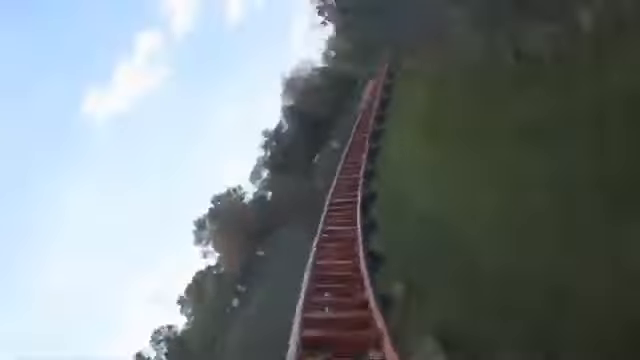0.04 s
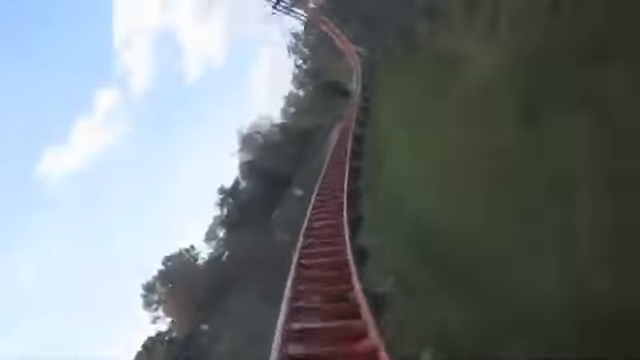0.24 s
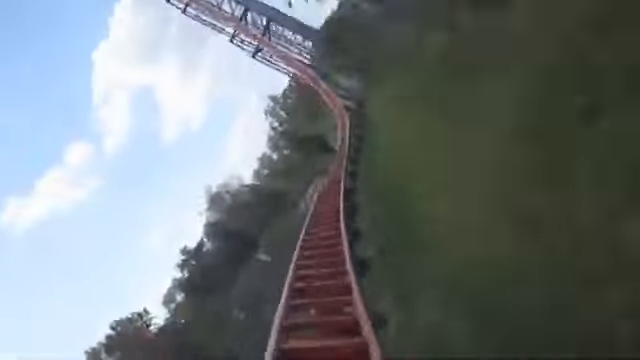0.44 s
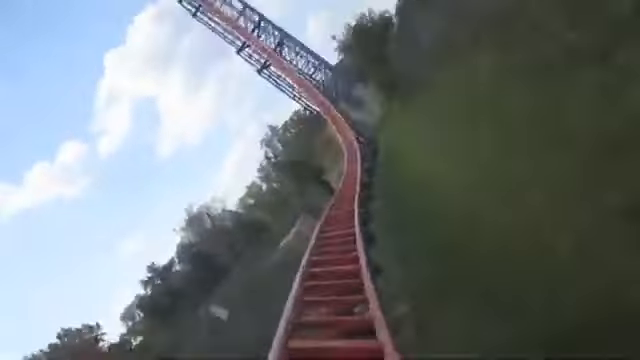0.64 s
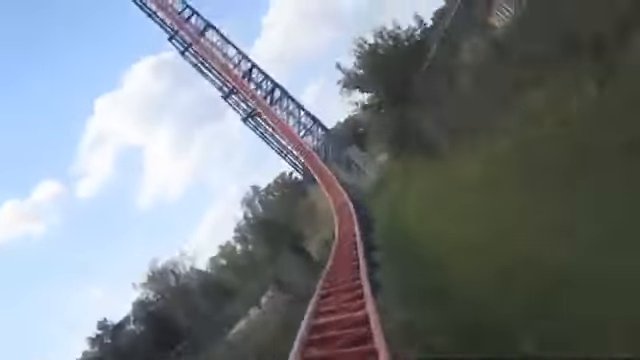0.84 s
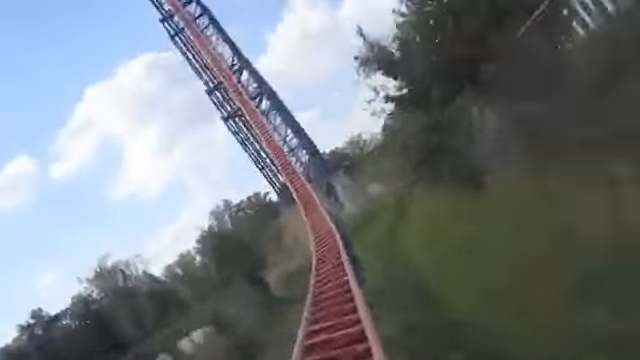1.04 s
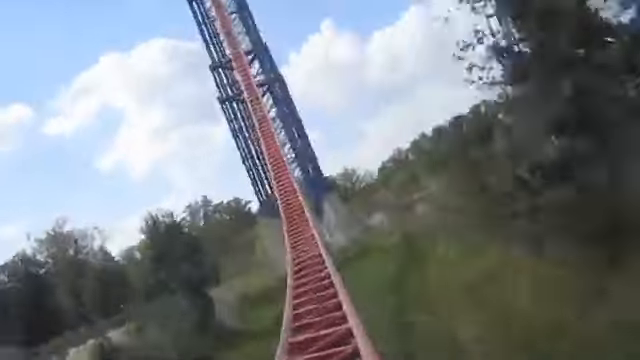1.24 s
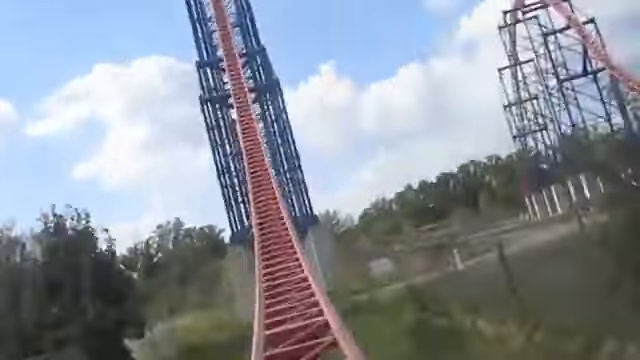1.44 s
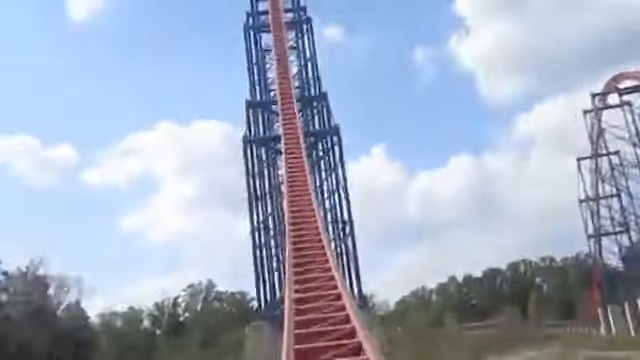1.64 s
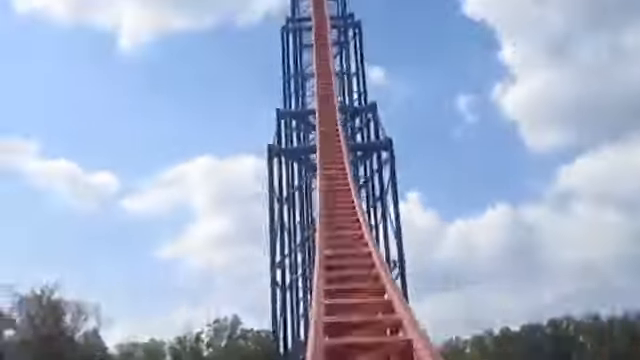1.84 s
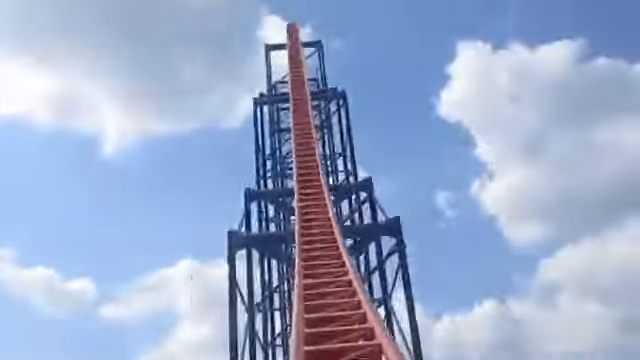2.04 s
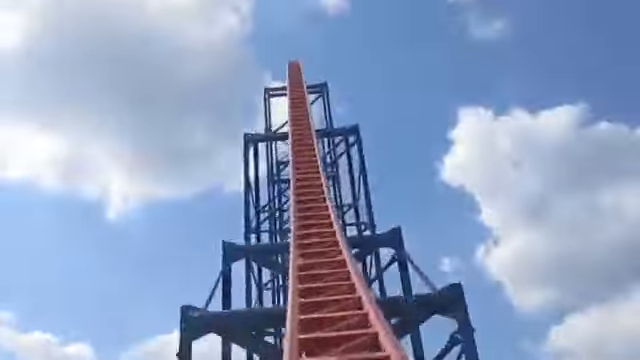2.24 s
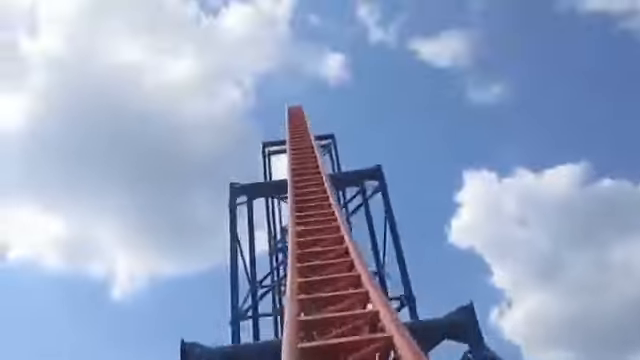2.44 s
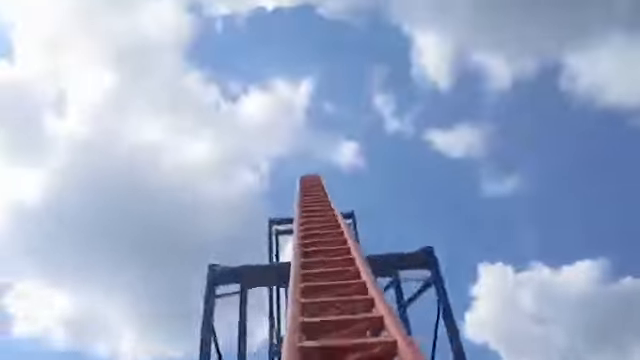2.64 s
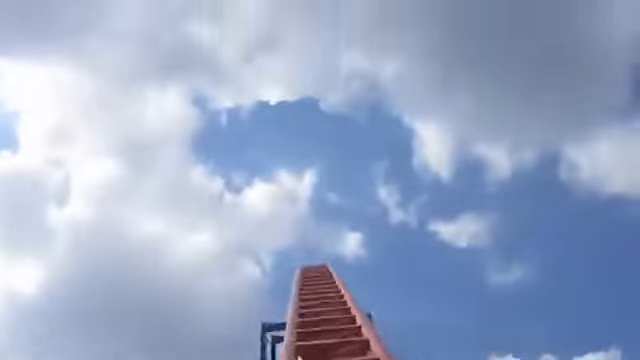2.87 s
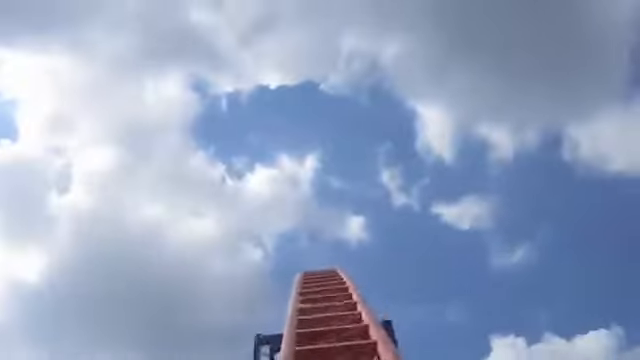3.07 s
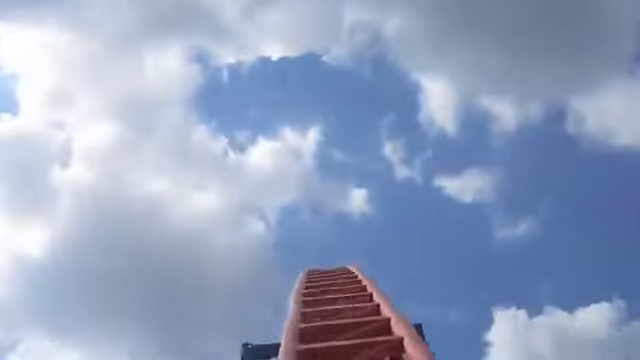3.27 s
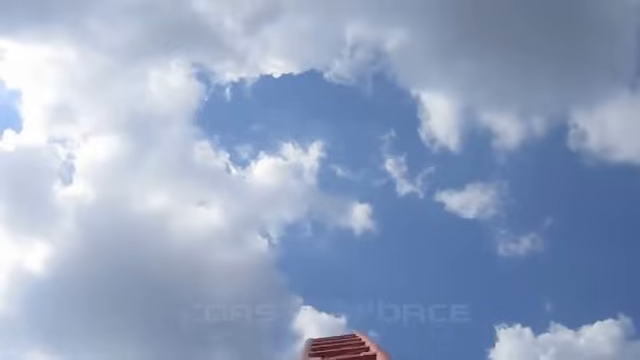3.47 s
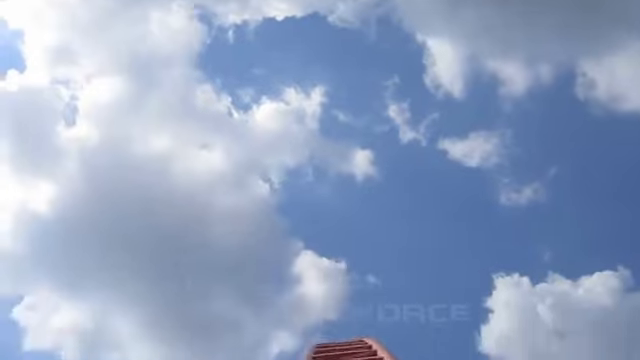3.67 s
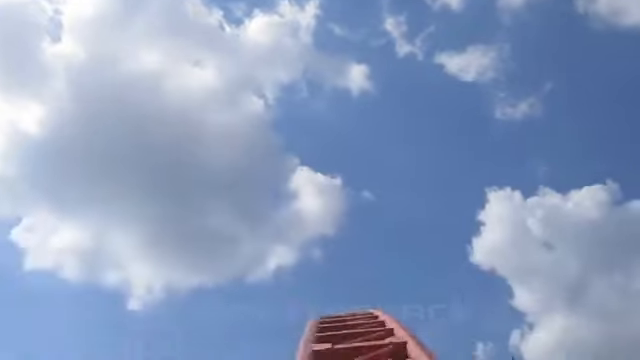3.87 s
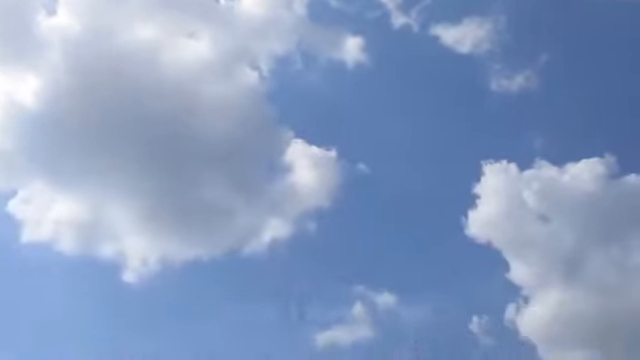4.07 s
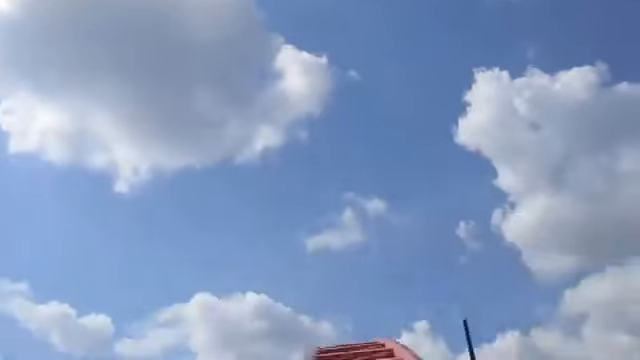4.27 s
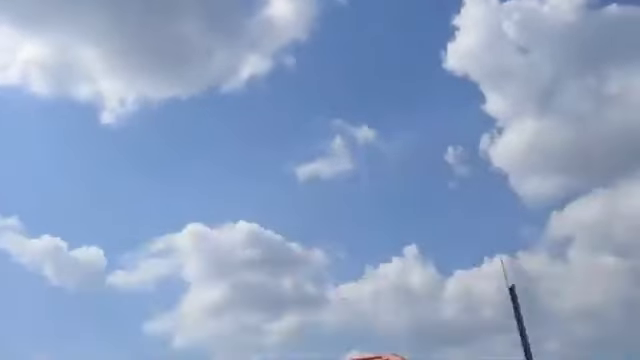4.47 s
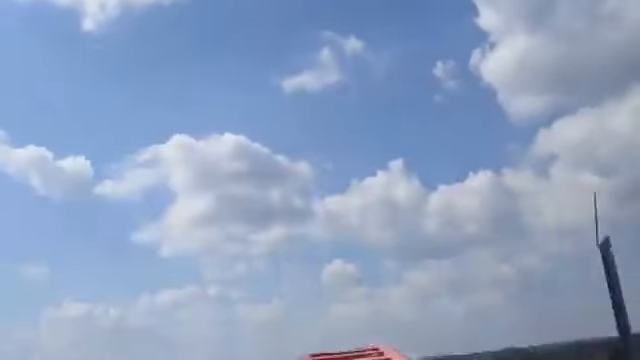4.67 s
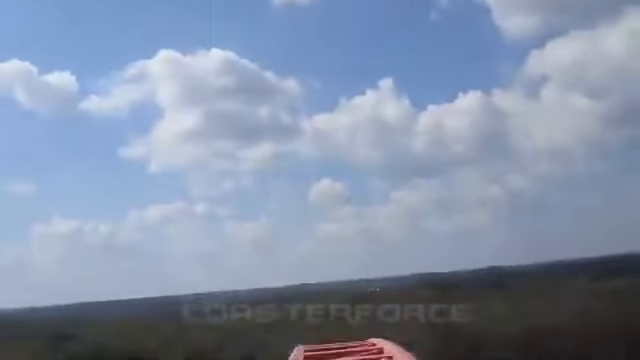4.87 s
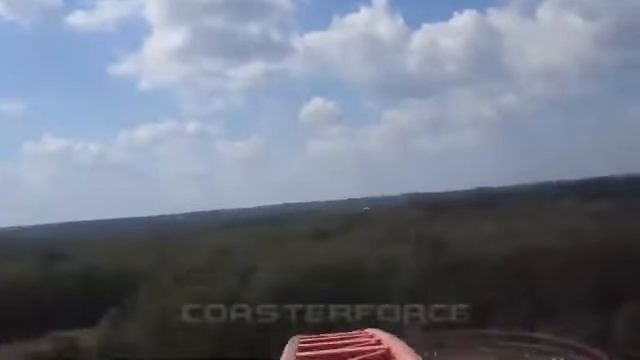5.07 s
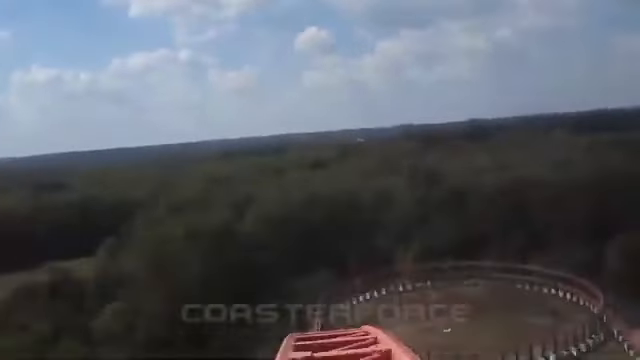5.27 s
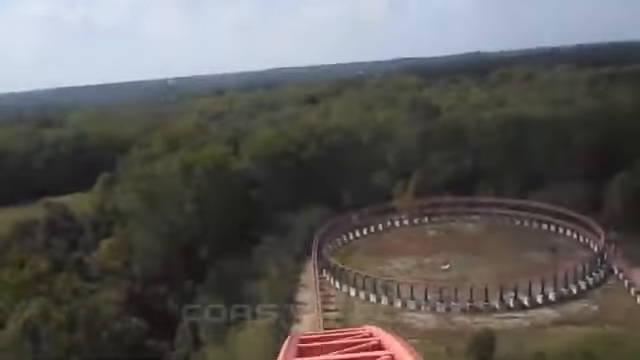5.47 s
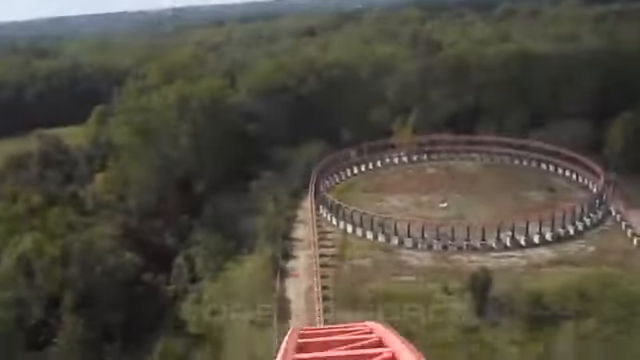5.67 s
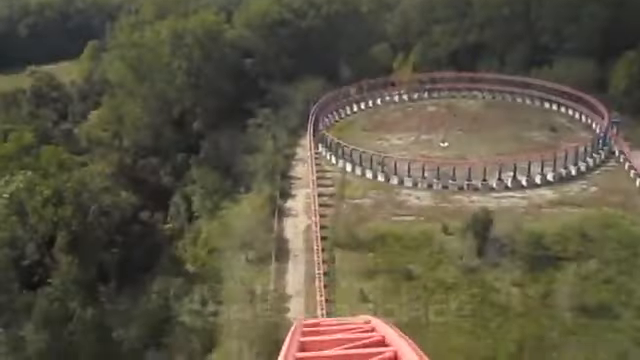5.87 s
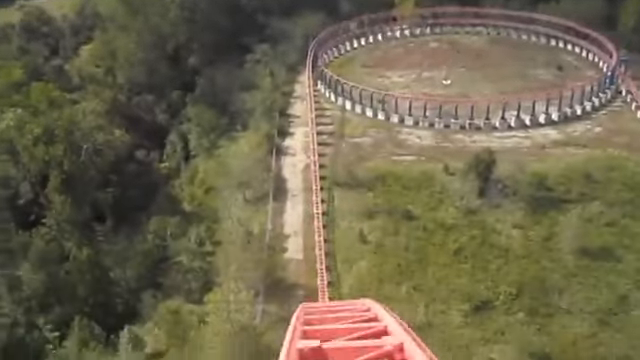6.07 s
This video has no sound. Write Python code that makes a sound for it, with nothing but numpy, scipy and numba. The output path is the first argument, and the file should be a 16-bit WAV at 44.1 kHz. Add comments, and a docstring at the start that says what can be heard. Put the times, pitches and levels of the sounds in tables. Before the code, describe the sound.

A steel coaster car roars and clatters in distorted, buffeting wind for nearly four seconds, then slows to a muffled, fluttering hum with faint ticks.

```python
"""Wind and wheel roar, overloaded and thick with knocks and rattle, are heard first; then the train slows and quietens.
A small microphone rides at the front of a steel roller coaster: out of a fast bend, up a hill, slowly over its crest.
Filtered noise makes the turbulence; resonators excited by noise or ticks make the car, wheels and loose parts ring.
The capsule and amplifier saturate on the strongest pressure."""
import sys
import numpy as np
from scipy import signal
from scipy.io import wavfile
from scipy.ndimage import uniform_filter1d
from numba import njit

SR = 44100
rng = np.random.default_rng(int(sys.argv[2]) if len(sys.argv) > 2 else 0)


def nominal_scale(level):
    """Amplitude ratio for a level in decibels (scalar or array-like)."""
    x = np.asarray(level, float) / 20
    return 10 ** x


def put_to_file(sound):
    """Save the sound as 16-bit audio at rate SR, in the file named by the first command-line argument."""
    columns = np.atleast_2d(sound).T  # one column per channel
    safe = np.clip(columns, -1, 1)
    whole_steps = np.round(safe * 32767)
    wavfile.write(sys.argv[1], SR, whole_steps.astype(np.int16))


N = 269451

# levels at the microphone, before overload; scene() scales the hum further:
# (time [s], roar [dB], buffeting [dB], rattle [dB], hiss [dB], hum [dB])
RIDE_LEVELS = [(0, -9, 1.5, -25, -35.5, -8), (.2, -8.5, -2, -19.5, -29, -11.5),
               (.4, -5, 0.5, -18, -30, -12.5), (.8, -6.5, -2.5, -21, -39.5, -11.5),
               (1.1, -8.5, 0, -20, -36, -11), (1.5, -8, -2, -23.5, -36, -12.5),
               (2, -8.5, -1.5, -22.5, -39, -7.5), (2.5, -6.5, -1, -18, -35, -11.5),
               (3.1, -7, -1, -19, -31.5, -8.5), (3.5, -9, -4.5, -23.5, -37, -8.5),
               (3.74, -16, -4, -28.5, -53, -16), (3.82, -16.5, -6, -36, -55, -15.5),
               (4.01, -21, -10, -40, -52, -18.5), (4.07, -18, -4.5, -29.5, -48.5, -13.5),
               (4.6, -15, -6, -33.5, -48.5, -18), (4.88, -23.5, -8, -40, -53, -19),
               (5.3, -22.5, -9, -41, -62, -17.5), (5.45, -17, -7, -34.5, -53, -28.5),
               (5.9, -24, -6, -40, -62, -21), (6.11, -19, -7, -37, -61, -20)]
# resonances of the car body: (centre [Hz], width [Hz], level [dB])
CAR_MODES = [(146.6, 105, -5.5), (274, 220, -6.5), (379, 122, -4), (518, 174, -2), (772.5, 245, -0.5),
             (957, 265, -9.5), (1218, 146, -10.5)]
# resonances of the loose steel parts: (centre [Hz], width [Hz], level [dB])
LOOSE_MODES = [(1540, 540, 7.5), (2135, 970, 6.5), (2660, 620, -0.5), (3800, 950, -0.5), (5060, 930, -5.5)]
# sharp knocks: (start [s], peak of the ring [dB], pitch [Hz])
KNOCK_EVENTS = [(0.0852, -7, 1740), (0.3925, -3, 1830), (0.551, -11.5, 3700), (0.5911, -9, 4970),
                (0.6125, -5.5, 1970), (0.6694, -9.5, 3040), (0.694, -5.5, 3960), (0.7704, -10, 4800),
                (1.591, -3, 2120), (1.5986, -6, 2340), (1.652, -11.5, 3470), (1.688, -10.5, 3650),
                (1.722, -15, 3230), (1.739, -13, 2740), (1.9092, -11, 2250), (2.128, -6.5, 2290),
                (2.1735, -8.5, 1710), (2.304, -9, 2210), (2.4004, -12.5, 1980), (2.5563, -6.5, 2300),
                (2.6895, -6, 3440), (2.784, -14, 2250), (2.8245, -11, 1740), (2.8997, -8, 2310),
                (3.0649, -4.5, 2270), (3.069, -8, 2100), (3.1723, -11, 2070), (3.2003, -10.5, 2300),
                (3.237, -7, 1820), (4.0327, -17.5, 1820), (4.0836, -19, 2230), (4.1848, -19.5, 2700),
                (4.219, -28, 2250), (4.28, -31, 4500), (4.389, -15, 1500), (4.566, -24, 5870),
                (4.574, -28, 5500), (4.6385, -25, 3800), (4.649, -26.5, 3750), (4.662, -23, 2380),
                (4.819, -24, 2390), (4.8485, -27, 5500), (4.9286, -24, 2300), (4.9435, -26, 2190),
                (5.0474, -42, 2000), (5.7216, -18, 2100)]
# noise bands of the hiss at the port: (centre [Hz], width [Hz], level [dB])
PORT_BANDS = [(4500, 2500, -13), (5500, 6800, 8.5), (8800, 8400, -20), (12600, 2900, -3)]
# jolts that shake the loose parts: (centre [s], length [s], rattle level [dB])
RATTLE_JOLTS = [(0.09, 0.032, -15), (0.29, 0.054, -28), (0.652, 0.012, -27), (0.681, 0.052, -14),
                (0.938, 0.0062, -14), (1.265, 0.0082, -21), (1.594, 0.077, -23), (1.73, 0.082, -25),
                (1.916, 0.034, -19), (2.101, 0.02, -23), (2.691, 0.015, -21.5), (2.843, 0.01, -21),
                (3.068, 0.026, -16), (3.176, 0.0093, -26), (3.495, 0.037, -23), (3.903, 0.041, -39),
                (4.086, 0.011, -46), (4.282, 0.016, -30), (4.545, 0.022, -33), (4.655, 0.029, -26.5),
                (4.838, 0.03, -37), (4.975, 0.036, -32), (5.198, 0.017, -37), (5.405, 0.07, -39),
                (5.569, 0.016, -39), (5.685, 0.015, -34), (5.725, 0.016, -40), (5.993, 0.012, -35)]
# puffs of air past the port: (centre [s], length [s], hiss level [dB])
AIR_PUFFS = [(0.142, 0.033, -28.5), (0.306, 0.045, -23.5), (0.393, 0.014, -30), (0.456, 0.026, -29),
             (0.592, 0.0067, -25), (0.615, 0.01, -22), (0.65, 0.014, -21), (0.68, 0.029, -23.5),
             (0.735, 0.0083, -25), (0.762, 0.043, -24.5), (0.936, 0.012, -25), (1.041, 0.063, -27),
             (1.215, 0.017, -37), (1.32, 0.015, -40), (1.587, 0.069, -42), (1.727, 0.063, -27),
             (1.828, 0.012, -28.5), (1.921, 0.032, -30), (2.129, 0.031, -34.5), (2.201, 0.035, -36),
             (2.304, 0.019, -24), (2.401, 0.014, -29), (2.512, 0.028, -34), (2.577, 0.042, -27.5),
             (2.696, 0.018, -35), (2.838, 0.01, -31), (2.902, 0.009, -34), (3.066, 0.015, -21),
             (3.085, 0.014, -29.5), (3.178, 0.0072, -23), (3.498, 0.019, -32), (4.05, 0.022, -43),
             (4.225, 0.027, -39.5), (4.284, 0.016, -35), (4.375, 0.035, -35), (4.42, 0.027, -32.5),
             (4.571, 0.013, -37), (4.65, 0.026, -51), (4.733, 0.027, -41), (4.85, 0.012, -40),
             (4.895, 0.015, -45), (5.037, 0.018, -39), (5.166, 0.025, -37.5), (5.257, 0.017, -43),
             (5.4, 0.024, -46)]
# hard shoves of wind on the capsule: (centre [s], length [s], peak [dB], direction [+1 in, -1 out])
WIND_SHOVES = [(0.019, 0.0024, 14, 1), (0.1204, 0.0028, -2.5, 1), (0.294, 0.002, 7.5, 1),
               (0.5687, 0.0052, 3.5, 1), (0.622, 0.003, 3.5, -1), (0.824, 0.0022, 14, -1),
               (0.9425, 0.0045, 12, -1), (1.132, 0.0047, 8, 1), (1.3911, 0.0019, 4, 1),
               (1.409, 0.0069, 8, 1), (1.589, 0.0025, 6, 1), (1.6265, 0.003, 6.5, 1),
               (1.8443, 0.0016, 6, -1), (2.1601, 0.0033, 9.5, -1), (2.172, 0.0025, 9.5, -1),
               (2.2275, 0.0049, 8, 1), (2.2476, 0.0041, 6, -1), (2.294, 0.0065, 5.5, 1),
               (2.433, 0.0022, -6, -1), (2.811, 0.0053, 3, -1), (3.107, 0.0035, 9, 1),
               (4.6325, 0.0066, 4, 1)]
# rolling tones, levels relative to the lower hum:
# (time [s], lower hum [Hz], upper hum level [dB], boom level [dB])
ROLLING_TONES = [(0, 497, -10, 5.5), (.6, 497, -0.5, 9.5), (1, 485, 0.5, 3), (1.8, 475.2, 0, 1),
                 (2.6, 488, 1, -6), (3.3, 491, -1, 2), (3.8, 475, 1.5, 3), (4.3, 487.5, -8, 2),
                 (4.8, 496, -7, -2.5), (5.5, 490, -7.5, 7.5), (6.11, 484, -5, 0)]
# rising whoops; the glide takes twice the length:
# (centre [s], length [s], start [Hz], end [Hz], peak [dB])
BASS_WHOOPS = [(.2, .07, 170, 205, -8), (3.69, .035, 245, 290, -7), (4.2, .04, 170, 280, -10),
               (5.45, .045, 180, 320, -7)]
# surges of the lower hum: (centre [s], length [s], level [dB])
LOWER_HUM_SURGES = [(.09, .05, -7), (1.66, 0.05, -14), (4.08, 0.028, -27), (4.135, 0.052, -13),
                    (4.57, 0.087, -17.5), (5.15, 0.054, -29), (5.33, 0.045, -26), (5.6, 0.053, -25.5),
                    (5.86, 0.036, -17)]
# surges of the low boom: (centre [s], length [s], level [dB])
LOW_BOOM_SURGES = [(.12, 0.037, -17), (.39, 0.045, -13), (.55, 0.16, -15.5), (3.8, 0.072, -10.5),
                   (4.27, 0.053, -12), (4.81, 0.12, -14), (5.36, 0.035, -12), (5.62, 0.062, -7)]
# resonances of the slowly rolling wheels: (centre [Hz], width [Hz], level [dB])
SLOW_ROLL_MODES = [(853, 230, 0.5), (2160, 460, -12), (2640, 560, -15.5)]
# level of the slow rolling, before its fast flutter: (time [s], level [dB])
SLOW_ROLL_GAIN = [(3.5, -39.5), (4.0, -33), (4.1, -26), (4.4, -25.5), (4.66, -22.5), (4.78, -32),
                  (4.84, -23), (4.9, -35), (4.97, -20), (5.02, -34), (5.1, -28), (5.32, -33), (5.39, -24.5),
                  (5.55, -28.5), (5.64, -30), (5.71, -26.5), (5.85, -30), (6.0, -26), (6.11, -27)]

SLOWS_S = 3.8, 4.0  # the train loses its speed
EDDY_TOP_HZ = 990
HUM_WIDTH_HZ, UPPER_HUM_HZ, BOOM_HZ, BOOM_WIDTH_HZ = 37.3, 561.6, 131.9, 22.6
CRACKLE_PER_S, CRACKLE_SPREAD_DB, CRACKLE_HZ = 190, 7, 5500
CRACKLE_DB = -3  # relative to the hiss
KNOCK_WIDTH, KNOCK_DECAY_S = .22, .0018  # width as a share of the pitch
KNOCK_CRACK_DB = -9  # peak relative to the ring
CHATTER_PER_S, CHATTER_SPREAD_DB = 420, 3.5
CHATTER_DB, SLOW_CHATTER_DB = -4.5, -10  # relative to the smooth rattle, fast and slow
COUPLING_HZ, LOW_CUT_HZ, SMOOTH_HZ = 215, 172, 3990
CAPSULE_RAIL, RAIL_UP, RAIL_DOWN = .95, .49, .46
SELF_NOISE_DB, CONVERTER_NOISE_DB = -47.5, -73  # self noise before the treble smoothing


@njit
def svf(x, hz, width):
    """State-variable resonance: a band-pass of gain 1 at a centre that may move."""
    y, band, low = np.empty(len(x)), 0., 0.
    for i in range(len(x)):
        g = np.tan(np.pi * hz[i] / SR)
        k = width / hz[i]
        v = (band + g * (x[i] - low)) / (1 + g * (g + k))
        band = 2 * v - band
        low = low + 2 * g * v
        y[i] = k * v
    return y


def unit(x):
    """Normalization by mean power: scales to rms 1."""
    return x / np.sqrt(np.mean(x ** 2))


def walk(rate):
    """Slow random modulation: levels held 1 / rate s, slewed twice, rms 1."""
    hold = int(SR / rate)
    steps = np.repeat(rng.standard_normal(N // hold + 1), hold)
    slewed = uniform_filter1d(uniform_filter1d(steps, hold), hold)
    return unit(slewed[:N])


def ring(modes, flicker_db, rate, drift):
    """Modal superposition: noise excites resonances that flicker in level and drift in centre."""
    out = 0
    for hz, width, db in modes:
        shake = rng.standard_normal(N) * nominal_scale(flicker_db * walk(rate))
        centre = hz * (1 + drift * walk(3.077))
        mode = svf(svf(shake, centre, 1. * width), centre, 2. * width)
        out = out + nominal_scale(db) * unit(mode)
    return unit(out)


def along(s, values):
    """Linear interpolation of values over the whole time."""
    return np.interp(np.arange(N) / SR, s, values)


def curve(table):
    """Logarithmic level law: decibel columns interpolated, then turned into gains."""
    s, *columns = np.transpose(table)
    return [nominal_scale(along(s, c)) for c in columns]


def swells(table):
    """Gaussian envelopes: one bell per row, at half height at the ends of its length."""
    t, out = np.arange(N) / SR, np.zeros(N)
    for s, length, db in table:
        near = slice(max(int((s - 2 * length) * SR), 0), int((s + 2 * length) * SR))
        out[near] += nominal_scale(db) * .5 ** (((t[near] - s) / (length / 2)) ** 2)
    return out


def saturate(x, rail, knee):
    """Amplitude limiting: nearly straight below the rail, flat above; a larger knee is harder."""
    return x / (1 + np.abs(x / rail) ** knee) ** (1 / knee)


def slowness():
    """Linear deceleration index: 0 at speed, 1 once the train is slow."""
    return along(SLOWS_S, [0, 1])


def hiss():
    """Edge turbulence: small eddies at the port make broad noise that flutters quickly."""
    return unit(ring(PORT_BANDS, 0.63, 45, 0.047) * nominal_scale(0.65 * walk(71)))


def crackle():
    """Impulsive noise: random ticks of scattered size, each a bright burst decaying in about a millisecond."""
    sizes = nominal_scale(CRACKLE_SPREAD_DB * rng.standard_normal(N))
    ticks = (rng.random(N) < CRACKLE_PER_S / SR) * sizes
    envelope = signal.lfilter([1], [1, -np.exp(-1 / (0.0014 * SR))], ticks)
    tails = envelope * rng.standard_normal(N)
    return unit(svf(tails, np.full(N, 1. * CRACKLE_HZ), 4400.0))


def slow_roll():
    """Modal ringing of the wheels: at low speed their own resonances come through in gusts."""
    gain = curve(SLOW_ROLL_GAIN)[0] * nominal_scale(1.2 * walk(35))
    return gain * ring(SLOW_ROLL_MODES, 2.6, 30, 0.032)


def whoops():
    """Frequency modulation: each whoop is a brief sine that glides upwards."""
    out = 0
    for s, length, start_hz, end_hz, db in BASS_WHOOPS:
        hz = along([s - length, s + length], [start_hz, end_hz])
        phase = 2 * np.pi * np.cumsum(hz) / SR
        out = out + swells([(s, length, db)]) * np.sin(phase)
    return out


def knocks():
    """Impact excitation: each knock is a bright crack and a compact damped ring at its pitch."""
    size = 2048
    out, t = np.zeros(N + size), np.arange(size) / SR
    noises = rng.standard_normal((len(KNOCK_EVENTS), size))
    for (s, db, hz), noise in zip(KNOCK_EVENTS, noises):
        pitch = np.full(size, 1. * hz)
        damped = np.sin(2 * np.pi * hz * t) * np.exp(-t / KNOCK_DECAY_S)
        body = svf(damped, pitch, KNOCK_WIDTH * hz)
        crack = svf(noise * np.exp(-t / .0012), 2 * pitch, 2.5 * hz)
        burst = body / np.abs(body).max() + nominal_scale(KNOCK_CRACK_DB) * crack / np.abs(crack).max()
        start = int(s * SR)
        out[start:start + size] += nominal_scale(db) * burst
    return out[:N]


def rattle():
    """Forced and impact vibration: loose parts shake in quick bursts, and scattered ticks ring them."""
    bursts = nominal_scale(0.5 * walk(54) + 0.48 * walk(330))
    smooth = unit(ring(LOOSE_MODES, 1.8, 60, 0.024) * bursts)
    chatter = 0
    for hz, width, db in LOOSE_MODES:
        sizes = nominal_scale(CHATTER_SPREAD_DB * rng.standard_normal(N))
        ticks = (rng.random(N) < CHATTER_PER_S / len(LOOSE_MODES) / SR) * sizes
        centre = hz * (1 + 0.076 * walk(40))
        part = svf(svf(ticks, centre, 0.32 * width), centre, 2. * width)
        chatter = chatter + nominal_scale(db) * unit(part)
    chatter_db = CHATTER_DB + (SLOW_CHATTER_DB - CHATTER_DB) * slowness()
    return unit(smooth + nominal_scale(chatter_db) * unit(chatter))


def hum(gain):
    """Narrow-band resonance: two tones of the rolling train and a low boom come and go."""
    s, hz, upper_db, boom_db = np.transpose(ROLLING_TONES)
    lower_hz = along(s, hz) * (1 + 0.019 * walk(18))
    lower = ring([(lower_hz, HUM_WIDTH_HZ, 0)], 2.1, 18, .008)
    upper_hz = UPPER_HUM_HZ * (1 + 0.014 * walk(18))
    upper = ring([(upper_hz, 38, 0)], 3.4, 12, 0.014)
    boom = ring([(BOOM_HZ, BOOM_WIDTH_HZ, 0)], 3.6, 9, 0.035)
    lower_gain = gain + swells(LOWER_HUM_SURGES)
    upper_gain = gain * nominal_scale(along(s, upper_db))
    boom_gain = gain * nominal_scale(along(s, boom_db)) + swells(LOW_BOOM_SURGES)
    return lower_gain * lower + upper_gain * upper + boom_gain * boom


def roar():
    """Structure-borne sound: wheels on rail keep the car body's modes ringing."""
    return ring(CAR_MODES, 0.85, 25.24, 0.025)


def shoves():
    """Pressure pulses: each shove of wind pushes the diaphragm in or pulls it out."""
    inward = swells([row[:3] for row in WIND_SHOVES if row[3] > 0])
    outward = swells([row[:3] for row in WIND_SHOVES if row[3] < 0])
    return inward - outward


def buffeting():
    """Turbulent pressure: large eddies push the diaphragm with deep, gusty noise."""
    eddies = svf(rng.standard_normal(N), np.full(N, 58.), 76.6)
    eddies = signal.lfilter(*signal.butter(2, EDDY_TOP_HZ, fs=SR), eddies)
    gusts = nominal_scale(1.0 * walk(16) + 1.27 * walk(5.98))
    return unit(svf(eddies, np.full(N, 70.), 544.0) * gusts)


def scene():
    """Superposition: everything shakes or blows at the microphone itself, so there is no room."""
    roar_gain, wind_gain, rattle_gain, hiss_gain, hum_gain = curve(RIDE_LEVELS)
    puffs = swells(AIR_PUFFS)
    air = (hiss_gain + puffs) * hiss()
    air = air + (hiss_gain + 0.54 * puffs) * nominal_scale(CRACKLE_DB) * crackle()
    parts = (rattle_gain + swells(RATTLE_JOLTS)) * rattle() + knocks()
    rolling = slow_roll() + whoops() + hum(0.66 * hum_gain) + roar_gain * roar()
    wind = shoves() + wind_gain * buffeting()
    return (air + parts + rolling + wind)[None]


def low_pass(x):
    """Removes everything above the highest recorded frequency."""
    return signal.sosfilt(signal.butter(12, 15180, fs=SR, output="sos"), x)


def record(dry):
    """Cascaded overload: the capsule pins, the coupling sags to zero, the amplifier clips the swing back."""
    x = saturate(dry, CAPSULE_RAIL, 4.5)
    for hz in COUPLING_HZ, LOW_CUT_HZ:
        x = signal.lfilter(*signal.butter(1, hz, "high", fs=SR), x)
    x = saturate(x, np.where(x > 0, RAIL_UP, RAIL_DOWN), 2.9)
    # the electronics' own hiss stays when the capsule is pinned
    x = x + nominal_scale(SELF_NOISE_DB) * rng.standard_normal(x.shape)
    x = signal.lfilter(*signal.butter(2, SMOOTH_HZ, fs=SR), x)
    x = x + nominal_scale(CONVERTER_NOISE_DB) * rng.standard_normal(x.shape)
    # the last 4 ms fade out
    x = x * np.minimum(np.arange(N)[::-1] / (.004 * SR), 1)
    return low_pass(x)


dry = scene()
out = record(dry)
put_to_file(out)
```